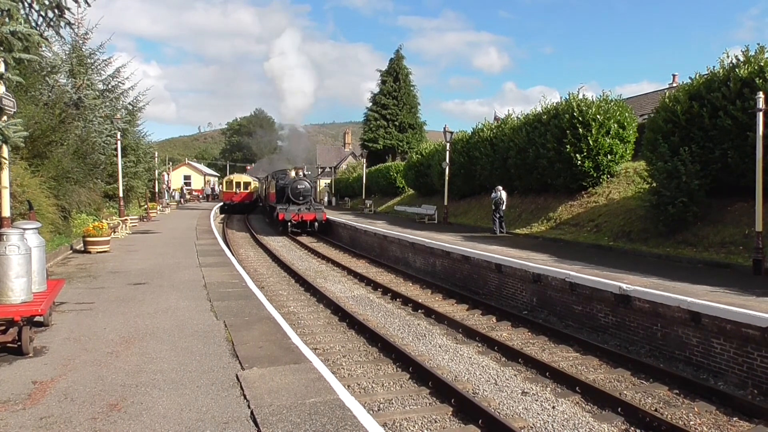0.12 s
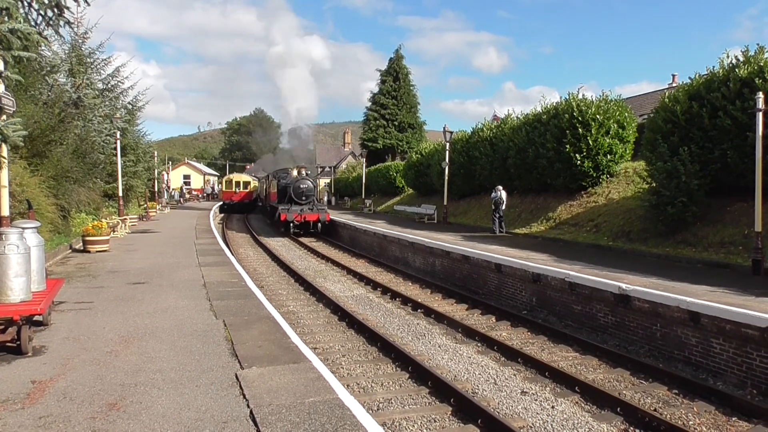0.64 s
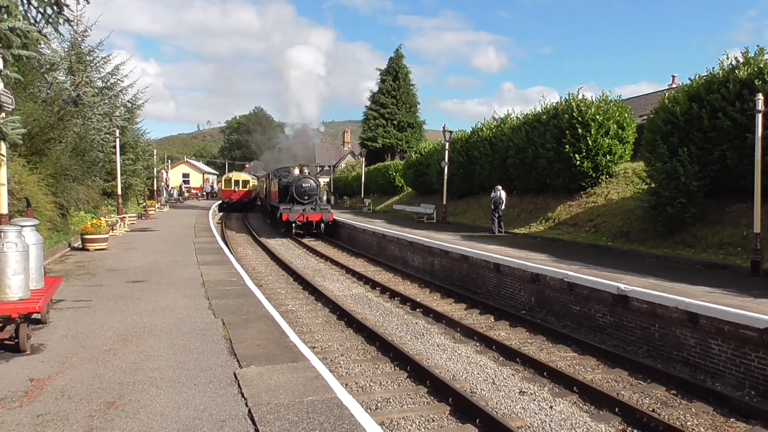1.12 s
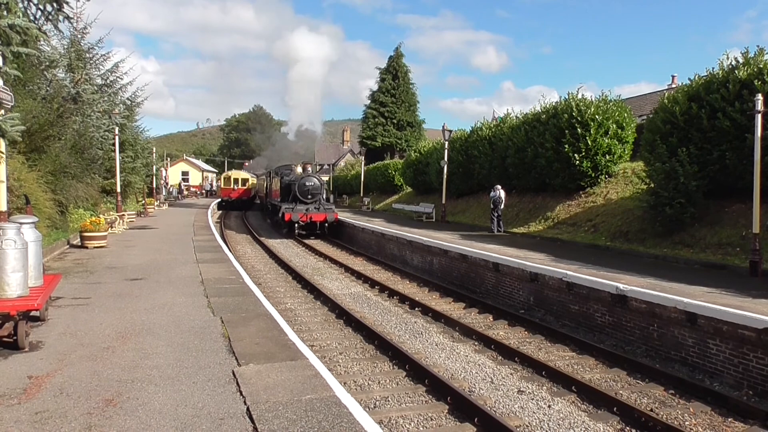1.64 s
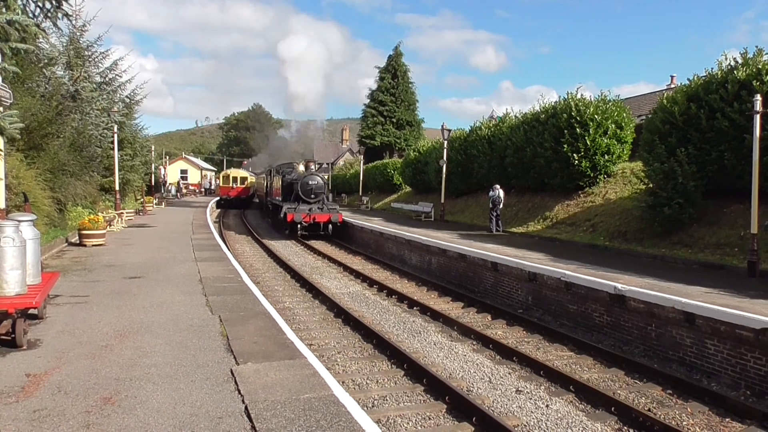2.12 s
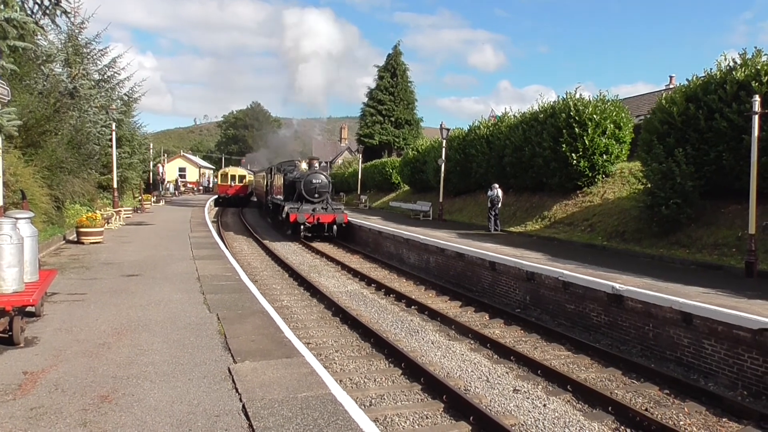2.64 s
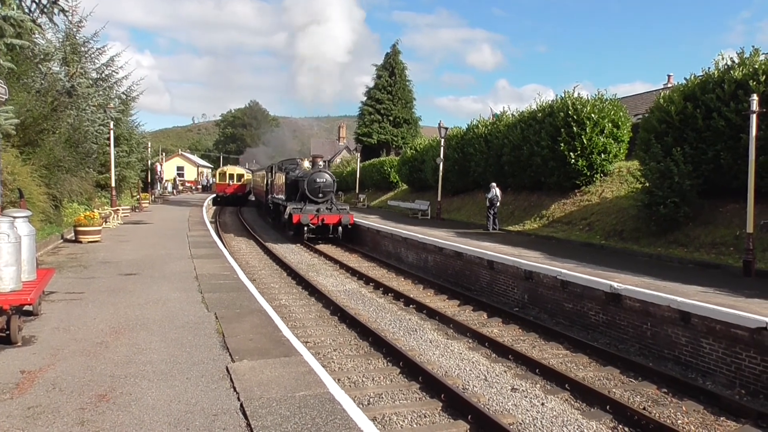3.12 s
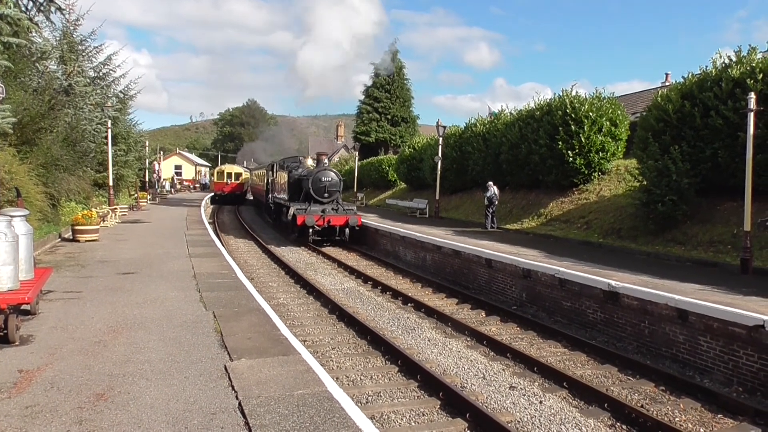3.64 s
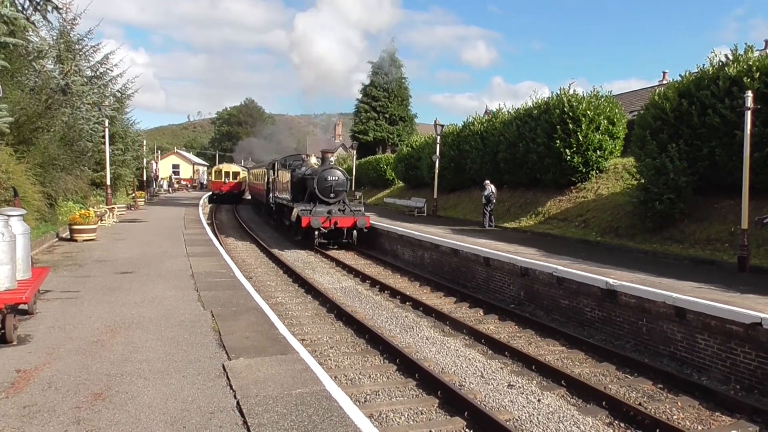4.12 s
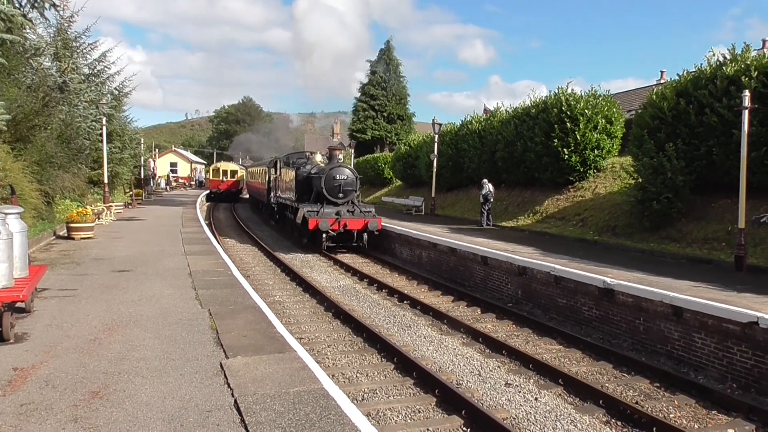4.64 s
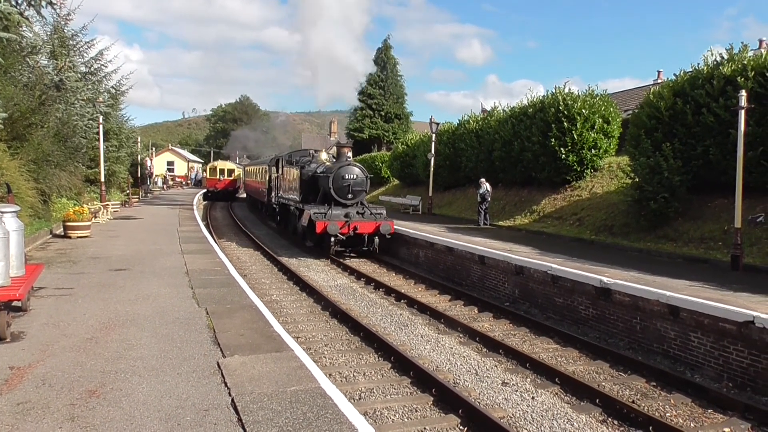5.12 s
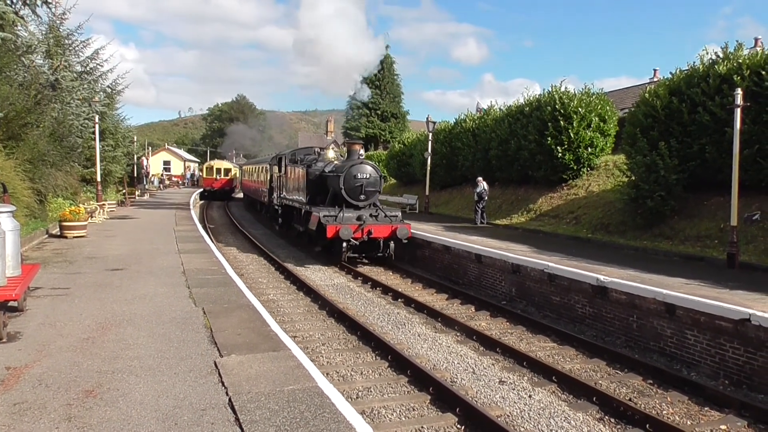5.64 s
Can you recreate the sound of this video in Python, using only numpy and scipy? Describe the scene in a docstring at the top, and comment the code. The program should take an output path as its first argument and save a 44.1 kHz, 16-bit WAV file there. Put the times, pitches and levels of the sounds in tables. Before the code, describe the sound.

On an open-air station platform, a steam locomotive approaches with deep, throaty exhaust chuffs about half a second apart, slightly quickening. Each booms low and ends in a short spit of steam. Constant bright hiss grows over a low wheel rumble; a heavy iron clunk comes just after four seconds, then lighter rattles near five and at the end. Stereo microphone on the opposite platform, faint dull echo.

```python
"""A steam locomotive pulls its train out of a country station, heard from the far platform.
From the start, exhaust beats drive a chimney resonance, roar and spit as turbulent jets, and echo from the
platform faces. Throughout, leaking steam hisses as jet noise, swelling as the engine nears, over the broadband
rumble and narrow ringing of wheels on rails. From about 4 s, jolts at rail joints clank as decaying iron modes."""
import sys
import numpy as np
from scipy import signal
from scipy.fft import rfft, irfft
from scipy.io import wavfile
from scipy.ndimage import uniform_filter1d

SR = 44100
rng = np.random.default_rng(int(sys.argv[2]) if len(sys.argv) > 2 else 0)


def amplitude_ratio(level_db):
    """Convert a level in decibels to the matching linear amplitude (field) ratio."""
    exponent = np.asarray(level_db, float) / 20
    return 10 ** exponent


def master_out(mix):
    """Clip the mix to full scale and print it as 16-bit PCM to the path in sys.argv[1]."""
    frames = np.transpose(np.atleast_2d(mix))
    ceiling = np.clip(frames, -1, 1)
    pcm = np.round(ceiling * 32767).astype(np.int16)
    wavfile.write(sys.argv[1], SR, pcm)


N = 253575
T = np.arange(N) / SR
HZ = np.fft.rfftfreq(N, 1 / SR)

# colour of escaping steam: (frequency [Hz], spectral level [dB per Hz])
STEAM_COLOUR = [(880, -5), (1500, -11), (1640, -34.5), (2160, -18), (2520, -14.5), (3190, -10.5),
                (4400, -11), (4760, -10.5), (6150, -9.5), (7930, 0), (9930, -2.5), (12000, -2.5),
                (15600, -22.5)]
# ringing modes of wheel and rail: (frequency [Hz], resonator width [Hz], level [dB])
IRON_MODES = [(208, 92, 3), (316, 38, 6), (424, 77, 3), (597, 83, 2), (736, 107, 2.5), (854, 77, 2.5),
              (1000, 95, -2.5), (1138, 240, 1.5), (1270, 210, -6), (1580, 330, -7)]


def along(table):
    """Spectral interpolation: a (frequency [Hz], value) table read at every HZ, straight on a log axis."""
    hz, value = np.transpose(table)
    return np.interp(np.log(HZ + 1), np.log(hz + 1), value)


def unit(x):
    """Normalisation to an rms of 1."""
    return x / np.sqrt(np.mean(np.abs(x) ** 2))


def noise(colour):
    """Spectral shaping: white noise weighted by a colour table, rms 1."""
    white = rng.standard_normal(N)
    return unit(irfft(rfft(white) * amplitude_ratio(along(colour)), N))


def resonate(x, hz, width_hz):
    """Resonance: two equal two-pole filters in series, output at rms 1."""
    b, a = signal.iirpeak(hz, max(hz / width_hz, .3), SR)
    once = signal.lfilter(b, a, x)
    return unit(signal.lfilter(b, a, once))


def ring(x, hz, width_hz):
    """Resonance of a single two-pole filter, output at rms 1."""
    b, a = signal.iirpeak(hz, max(hz / width_hz, .3), SR)
    return unit(signal.lfilter(b, a, x))


def walk(rate):
    """Slow random modulation, rms 1: random steps at a rate [Hz], smoothed twice."""
    k = int(SR / rate)
    steps = np.repeat(rng.standard_normal(N // k + 1), k)
    smooth = uniform_filter1d(uniform_filter1d(steps, k), k)
    return unit(smooth[:N])


def swell(start, rise, sharp):
    """Transient flow: peaks at 1 one rise time [s] after the start [s], then dies away."""
    u = np.clip((T - start) / rise, 0, 40)
    return (u * np.exp(1 - u)) ** sharp


def curve(table):
    """Gain in time along a (time [s], level [dB]) table."""
    return amplitude_ratio(np.interp(T, *np.transpose(table)))


def echoes(x, t60, level_db, dull_hz):
    """Reverberation: platform faces and hedge return a dull, dense tail, different left and right."""
    t = np.arange(SR) / SR
    decay = amplitude_ratio(-60 * t / t60) * (1 - np.exp(-t / 0.0043))
    tail = rng.standard_normal((2, SR)) * decay
    tail = signal.lfilter(*signal.butter(1, dull_hz, fs=SR), tail)
    tail = tail / np.sqrt(np.sum(tail ** 2) / 2)
    return amplitude_ratio(level_db) * signal.fftconvolve(x[None], tail, axes=1)[:, :N]


def rolling():
    """Rolling contact excites a broadband rumble, its bass and middle fluctuating apart, and narrow rail modes."""
    # rumble: (time [s], level [dB])
    roll_levels = [(0.0, -32), (1.5, -33.5), (3.79, -30), (4.32, -28.5), (4.66, -28.5), (5.1, -27),
                   (5.36, -24.5), (5.75, -26.5)]
    # colour of the rumble: (frequency [Hz], spectral level [dB per Hz])
    rail_colour = [(15, -71), (25, -56), (56, -10), (76, 1), (157, 2.5), (224, 4.5), (364, 1.5), (465, -9),
                   (550, -6), (604, -8), (846, -8), (912, -8.5), (1280, -11.5), (1630, -23), (2200, -17.5),
                   (2860, -83), (4840, -120)]
    sing_db, sing_width = -19, .35  # offset of the mode levels; share of each mode's listed width
    rumble = noise(rail_colour)
    bass = signal.lfilter(*signal.butter(1, 320., fs=SR), rumble)
    middle = rumble - bass
    sing = np.zeros(N)
    for hz, width_hz, db in IRON_MODES[2:-1]:
        mode = ring(rng.standard_normal(N), hz, sing_width * width_hz)
        sing += amplitude_ratio(sing_db + db + 1.5 * walk(6)) * mode
    murmur = amplitude_ratio(0.96 * walk(9)) * bass + amplitude_ratio(2.4 * walk(8)) * middle
    return curve(roll_levels) * (murmur + sing)


def leaking_steam():
    """Turbulent jet noise: steam sputters through leaks, a few of them narrow enough to half whistle."""
    # steam hiss: (time [s], level [dB])
    hiss_levels = [(0.0, -33.5), (0.85, -31), (1.15, -33.5), (1.94, -28), (3.28, -26.5), (3.46, -31),
                   (3.94, -26), (4.45, -27), (4.79, -25), (5.75, -25)]
    # half-whistling leaks: (frequency [Hz], resonator width [Hz], mean level relative to the hiss [dB])
    whistles = [(4707, 390, -19.5), (7830, 220, -11.5), (11920, 300, -19.5)]
    leaks = np.zeros(N)
    for hz, width_hz, db in whistles:
        leaks += amplitude_ratio(db + 0.66 * walk(6.6)) * resonate(rng.standard_normal(N), hz, width_hz)
    jet = amplitude_ratio(0.54 * walk(14)) * noise(STEAM_COLOUR)
    sputter = amplitude_ratio(0.52 * walk(90))
    return curve(hiss_levels) * sputter * (jet + leaks)


def steady():
    """Superposition of the two continuous sources, steam hiss and rolling rumble."""
    return leaking_steam() + rolling()


def clanks():
    """Impact on a modal body: a jolt at a rail joint rattles the iron modes nearest its strongest pitch."""
    # jolts: (time [s], level [dB], strongest pitch [Hz], reach around it [octaves], t60 [s])
    jolts = [(4.096, -21, 700, 0.45, 0.057), (4.112, -20, 950, .9, 0.48), (4.165, -4.5, 208, .25, 0.098),
             (4.898, -20, 600, 0.48, 0.43), (4.938, -20.5, 740, 1, 0.8), (5.066, -26, 1150, 0.09, 0.1),
             (5.522, -19.5, 420, 0.48, 0.48), (5.559, -20.5, 766, 0.75, 0.2), (5.6, -28.5, 865, 0.45, 0.98),
             (5.688, -20.5, 382, 0.43, 0.53)]
    shake = rng.standard_normal(N) * amplitude_ratio(2.06 * walk(220))
    rings = [amplitude_ratio(db) * resonate(shake, hz, width_hz) for hz, width_hz, db in IRON_MODES]
    mode_hz = np.transpose(IRON_MODES)[0]
    out = np.zeros(N)
    for start, db, hz, octaves, t60 in jolts:
        age = np.maximum(T - start, 0)
        reach = np.exp(-.5 * (np.log2(mode_hz / hz) / octaves) ** 2)
        attack = 1 - np.exp(-age / 0.0007)
        out += amplitude_ratio(db - 60 * age / t60) * attack * unit(reach @ rings)
    return out


def beats():
    """Pulsed flow into an air column: each gulp of steam thumps, booms in the chimney, roars and spits."""
    # exhaust beats: (valve opens [s], chimney pitch [Hz], boom [dB], roar [dB], spit [dB])
    gulps = [(-.03, 230, -23.5, -24, -35), (0.477, 220, -13.5, -16.5, -28.5), (0.97, 225, -14, -17.5, -26),
             (1.478, 190, -15, -20.5, -29.5), (1.958, 204, -17.5, -20.5, -24),
             (2.436, 194, -13.5, -23.5, -26), (2.894, 194, -13.5, -23.5, -24.5),
             (3.353, 205, -14, -20.5, -25), (3.8, 211, -14.5, -20.5, -23.5), (4.211, 201, -12, -19, -25.5),
             (4.589, 187, -13.5, -23, -23), (5.007, 201, -16, -24, -24), (5.416, 181, -13, -25, -22.5)]
    # colour of the roar: (frequency [Hz], spectral level [dB per Hz])
    roar_colour = [(160, -37), (280, -0.5), (518, -15), (709, -9), (790, -12.5), (1130, -12.5), (1390, -20),
                   (1650, -31), (2700, -29), (3400, -35.5), (5000, -36), (6500, -80), (11000, -120)]
    # chimney overtones: (multiple of its pitch [1], resonator width [Hz], level relative to the boom [dB])
    overtones = [(2.1, 69, -14), (4.6, 90, -18), (5.8, 90, -21)]
    # rise times [s], nearly equal, taken in turn by successive beats
    rises = (0.042, 0.041)
    slow_beat_s, slow_rise_s = 5.007, 0.052  # one beat drags
    # first push of the gulp; its level is relative to the boom and falls through the scene
    thump_hz, thump_db, thump_db_per_s, thump_rise_s = 146, -2, -3.8, 0.007

    roar, spit, gust = noise(roar_colour), noise(STEAM_COLOUR), rng.standard_normal(N)
    wobble, throb = walk(55), amplitude_ratio(2.9 * walk(45))
    deep = resonate(gust, thump_hz, 73.0)
    out = np.zeros(N)
    for k, (start, hz, boom_db, roar_db, spit_db) in enumerate(gulps):
        rise = slow_rise_s if abs(start - slow_beat_s) < .1 else rises[k % 2]
        # the air column holds a wavering pitch, turbulence blurs it
        phase = 2 * np.pi * np.cumsum(hz * (1 + 0.0602 * wobble)) / SR
        tone = np.sqrt(2) * np.sin(phase)
        boom = throb * tone + amplitude_ratio(-2.0) * resonate(gust, hz * 1.01, 105.0)
        for multiple, width_hz, db in overtones:
            boom += amplitude_ratio(db) * resonate(gust, hz * multiple, width_hz)
        out += amplitude_ratio(boom_db) * swell(start, rise, 1.65) * boom
        push_db = boom_db + thump_db + thump_db_per_s * start
        out += amplitude_ratio(push_db) * swell(start, thump_rise_s, 1.04) * deep
        out += amplitude_ratio(roar_db) * swell(start + 0.0033, rise * 1.02, 1.71) * roar
        # the spit has a sharp burst and a weaker, longer one
        burst = swell(start - 0.002, 0.024, 3.5) + 0.36 * swell(start - .03, 0.073, 3.5)
        out += amplitude_ratio(spit_db) * burst * spit
    return out


def pair(near, around):
    """Interchannel differences: two ports hear a source with own level and phase, scattered sound differs."""
    # level difference: (frequency [Hz], left minus right [dB])
    level_gap = [(60, -5), (110, -3), (200, -3.0), (380, -2.5), (700, 0.0), (1290, 1.5), (2380, 2),
                 (4400, -1), (8120, 1), (15000, -1.5)]
    # phase difference: (frequency [Hz], lead of the left [rad])
    phase_lead = [(0, 0), (860, 0.43), (2500, 0.29), (5080, 0.3), (7670, 0.52), (8960, 0), (9220, 1.2),
                  (9910, 1.4), (10300, 1.55), (10700, 0.76), (11400, 0.53), (12900, 0), (14000, 1),
                  (15300, 0.47)]
    # sound opposite in sign left and right: (frequency [Hz], gain [dB])
    diffuse = [(60, -32), (300, -25.5), (700, -17), (1400, -16.5), (3100, -17.5), (6800, -13),
               (8900, -10.5), (11000, -15), (15000, -11)]
    half = amplitude_ratio(along(level_gap) / 2) * np.exp(.5j * along(phase_lead))
    scatter = rfft(around) * amplitude_ratio(along(diffuse))
    direct = rfft(near) * np.array([half, 1 / half])
    return irfft(direct + np.array([scatter, -scatter]), N)


def scene():
    """Superposition of engine and train, direct and reverberant, as heard across the tracks."""
    knocks = beats() + clanks()
    tail = echoes(knocks, t60=1.0, level_db=-26.0, dull_hz=940.0)
    near = knocks + tail[0] + steady()
    around = 3.6 * tail[1] + steady()
    return pair(near, around)


def low_pass(x):
    """Removes everything above the highest recorded frequency."""
    return signal.sosfilt(signal.butter(12, 15730, fs=SR, output="sos"), x)


def record(dry):
    """Comb interference: a reflection off the body near the ports colours the treble; loud peaks saturate."""
    # reflection: (frequency [Hz], gain [dB])
    body = [(800, -43), (2000, -39), (4000, -25.5), (6000, -5), (7500, -15), (12000, -23)]
    body_lag_ms = 1.141
    comb = 1 - amplitude_ratio(along(body)) * np.exp(-2j * np.pi * HZ * body_lag_ms / 1000)
    x = irfft(rfft(dry) * comb, N)
    mix = np.tanh(0.67 * x) / 0.73
    return low_pass(mix)


dry = scene()
out = record(dry)
master_out(out)
```